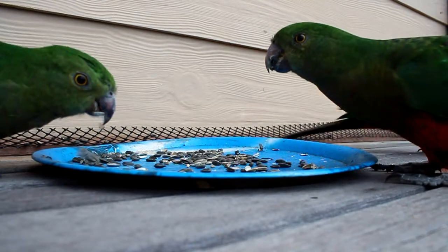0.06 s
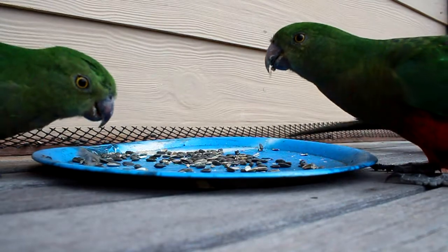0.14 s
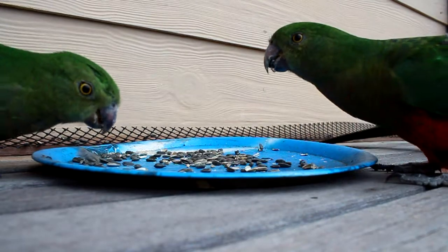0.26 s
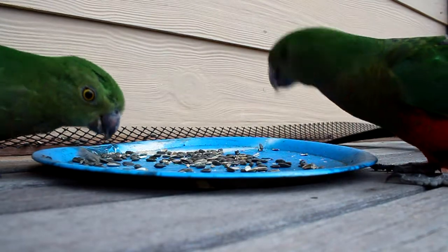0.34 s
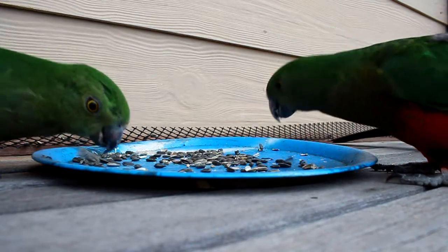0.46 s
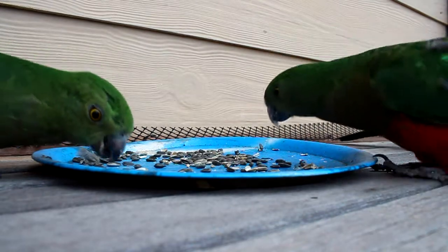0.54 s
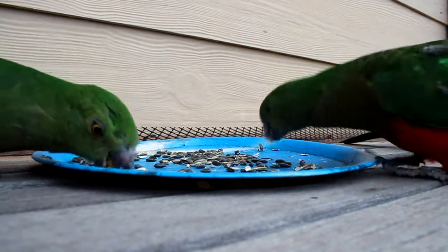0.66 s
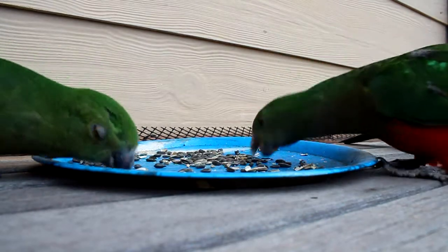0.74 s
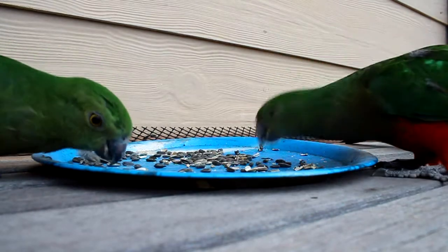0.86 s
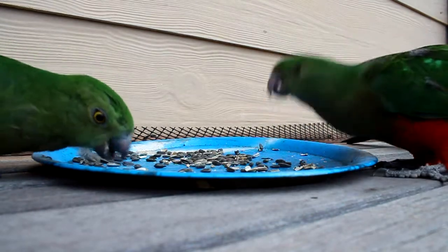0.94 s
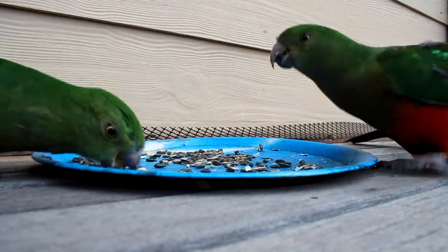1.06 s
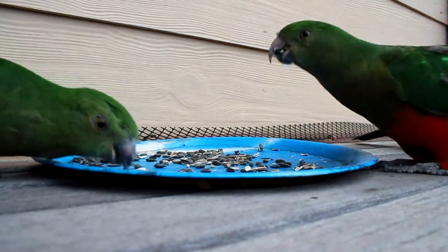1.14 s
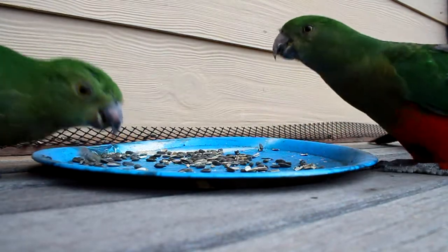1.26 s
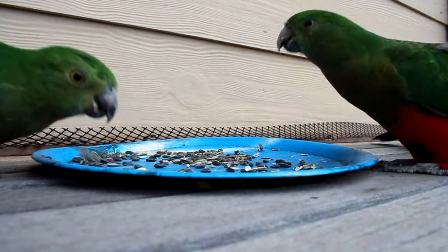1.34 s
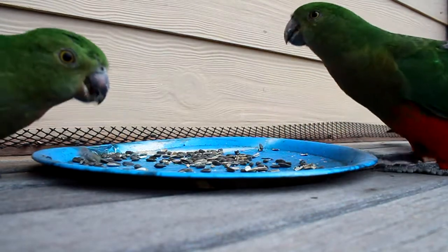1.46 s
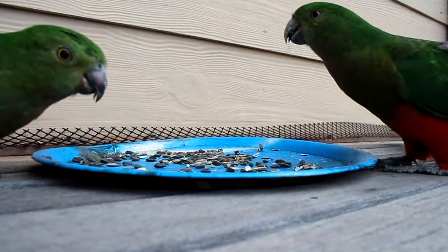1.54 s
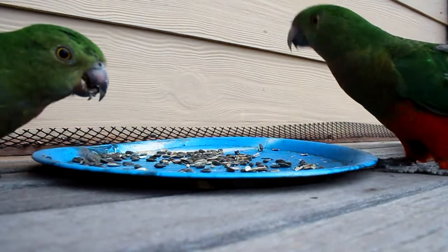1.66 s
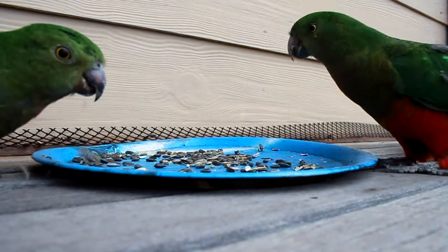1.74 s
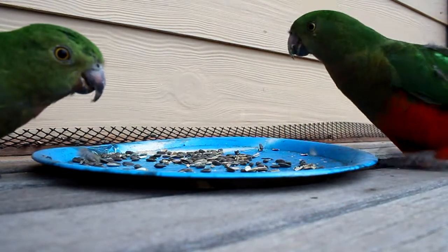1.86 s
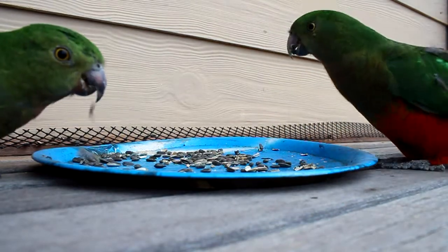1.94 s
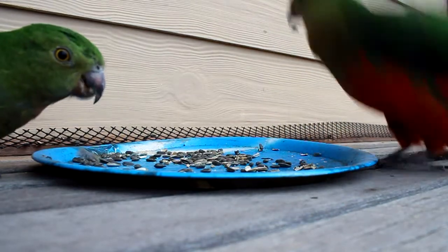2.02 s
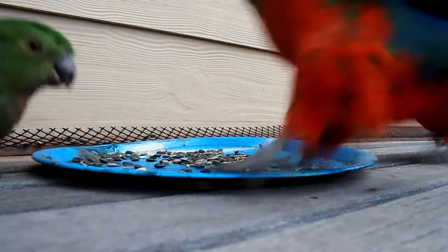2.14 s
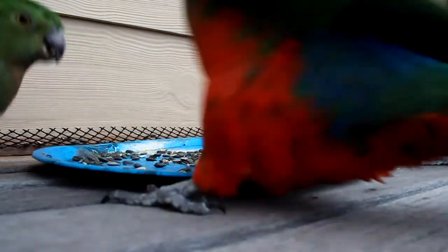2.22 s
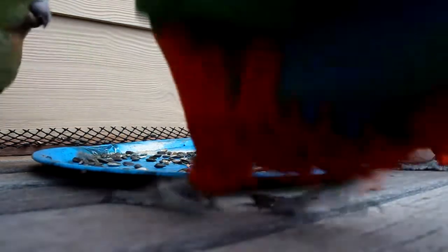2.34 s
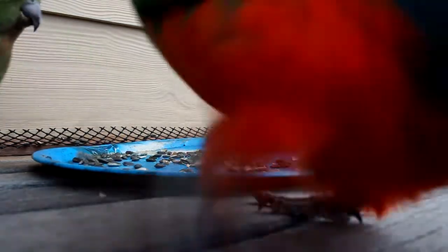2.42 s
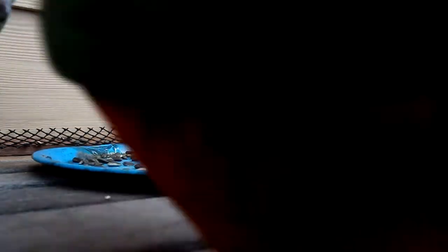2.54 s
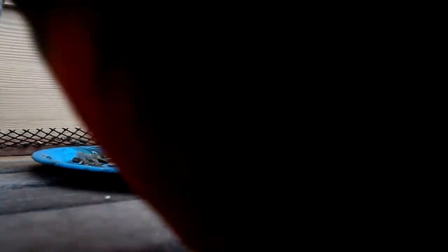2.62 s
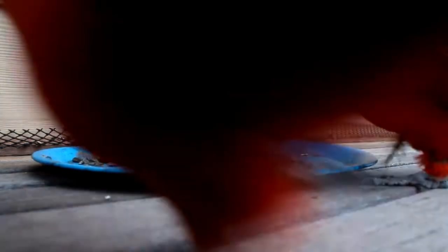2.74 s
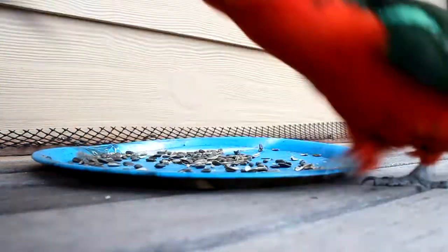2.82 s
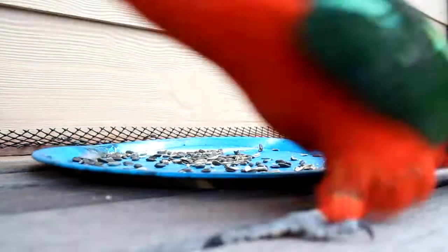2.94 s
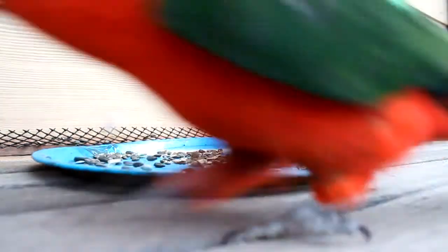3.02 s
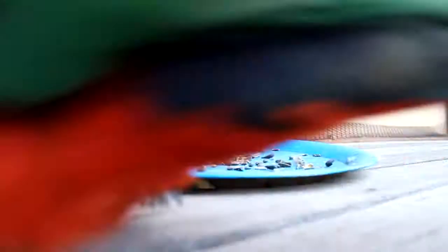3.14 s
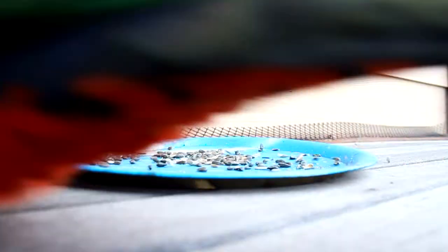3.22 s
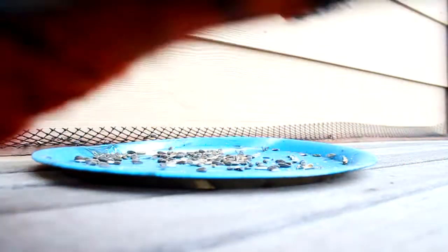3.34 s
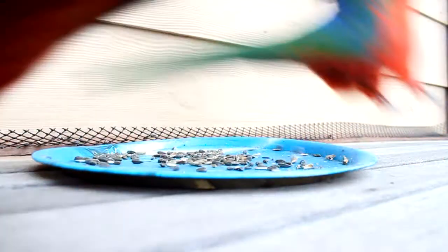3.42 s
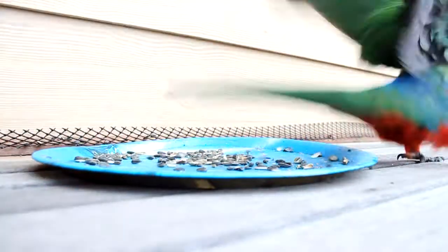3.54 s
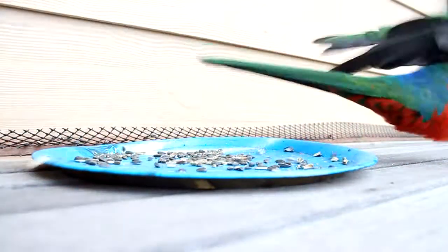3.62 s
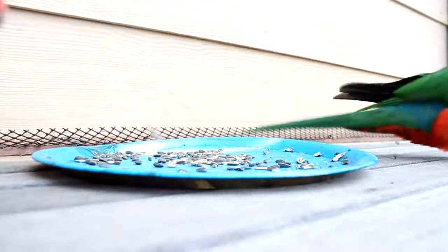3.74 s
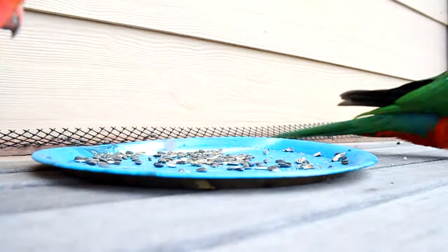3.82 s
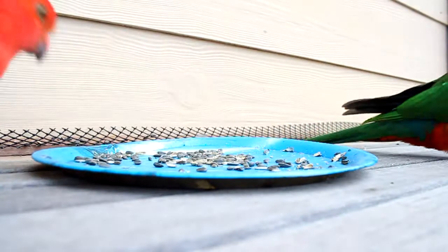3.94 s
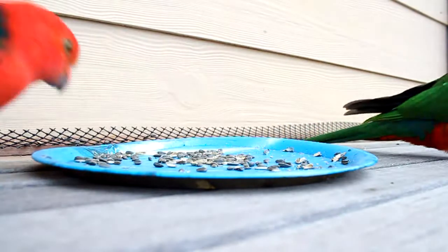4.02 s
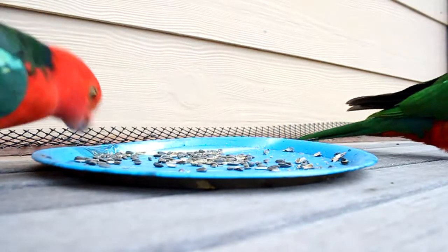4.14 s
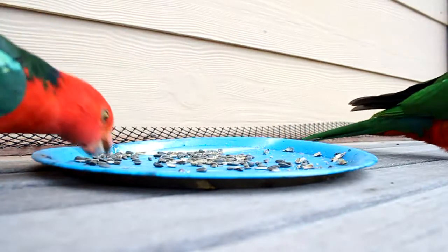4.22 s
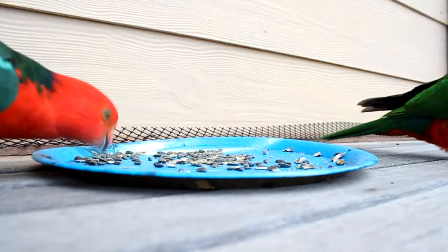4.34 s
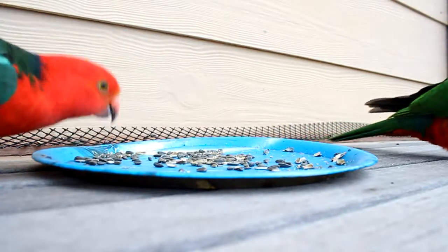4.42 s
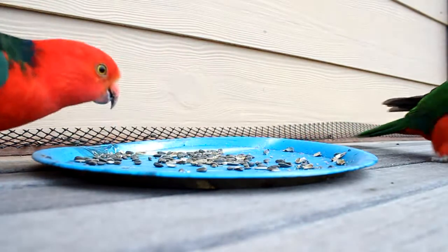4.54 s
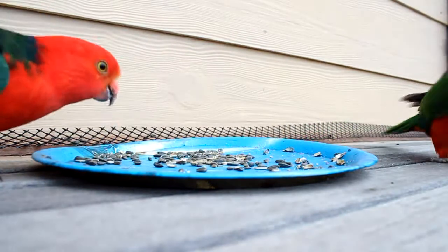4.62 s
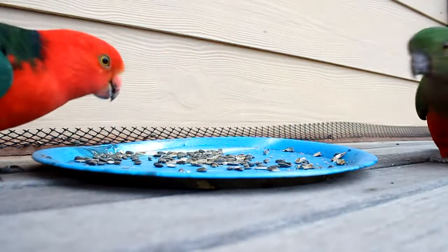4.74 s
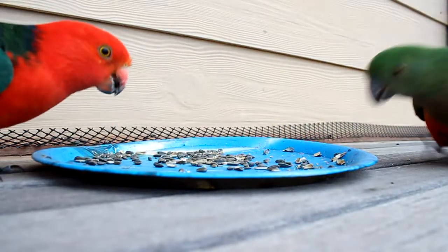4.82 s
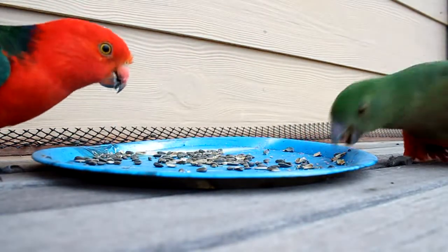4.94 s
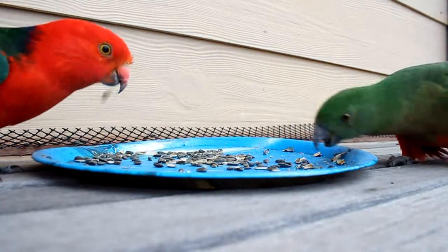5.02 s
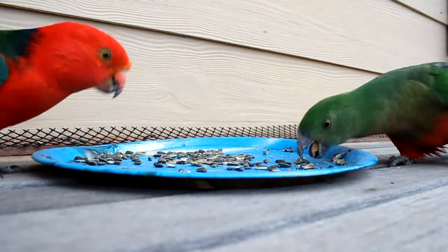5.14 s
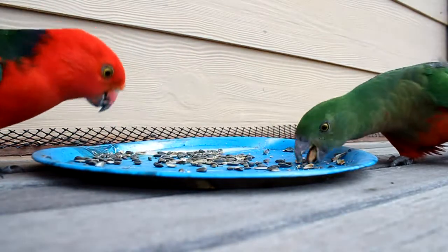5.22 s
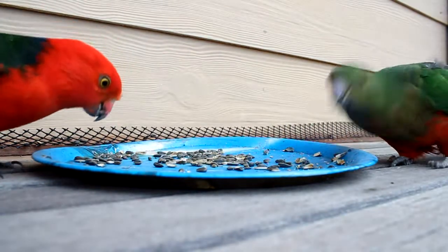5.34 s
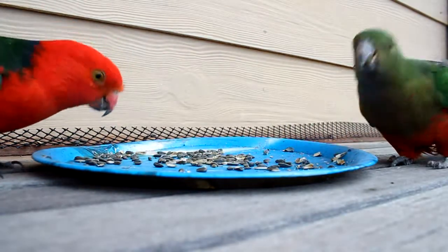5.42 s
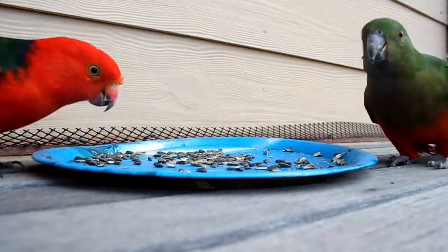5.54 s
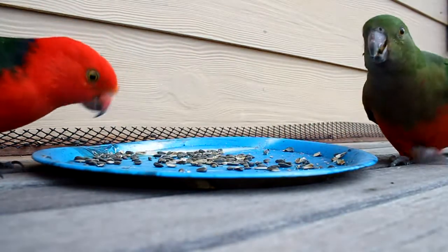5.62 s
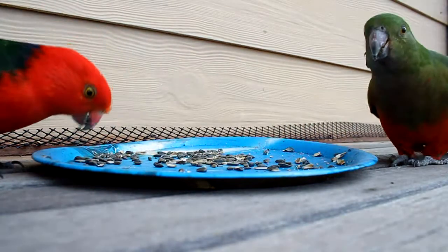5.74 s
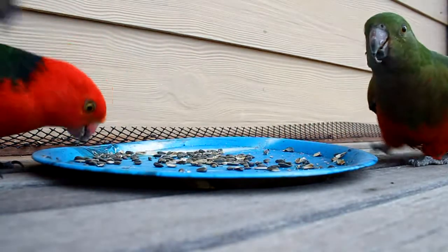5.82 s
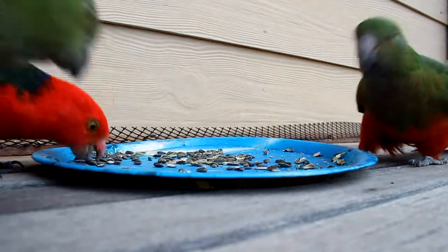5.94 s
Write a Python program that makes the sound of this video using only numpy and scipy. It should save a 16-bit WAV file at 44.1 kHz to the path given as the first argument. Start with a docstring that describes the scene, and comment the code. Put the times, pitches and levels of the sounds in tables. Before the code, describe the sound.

Close, crisp beak clicks and husk crunches, a mid-way burst of scuffing, squeaky chatter and low wing buffets, then sparser seed cracking.

```python
"""Parrots feed from a plastic plate on a wooden deck: beaks crack husks (a snap and clumped clicks through
resonances), knock the plate (rough contact into its modes) and peck the rim (decaying sines over a rattle).
Grains and noise make the rustle, low band noise the treads. A chattering squabble is pulses and breath noise
ringing in a throat; wing beats push short low swings of air at the close, small microphone.
Faint outdoor air and microphone hiss run throughout."""
import sys
import numpy as np
from scipy import signal
from scipy.fft import rfft, irfft
from scipy.io import wavfile
from scipy.ndimage import uniform_filter1d

SR = 44100
rng = np.random.default_rng(int(sys.argv[2]) if len(sys.argv) > 2 else 0)


def gain_from_db(level_db):
    """Convert decibel levels to linear amplitude factors (20 dB per decade)."""
    decades = np.asarray(level_db, float) / 20
    return 10 ** decades


def transcribe(u):
    """Save the signal u as a 16-bit wav file named by the first command-line argument.

    u: samples, shape (n,) or (channels, n), limited to [-1, 1]; the rate is SR.
    q: integer samples, one column per channel.
    """
    v = np.clip(np.atleast_2d(u).T, -1, 1)
    q = np.round(v * 32767).astype(np.int16)
    wavfile.write(sys.argv[1], SR, q)


N = 263277  # length [samples]

# modes of the plate: (frequency [Hz], relative level [dB], t60 [s])
PLATE_MODES = [(512.5, -5, 0.018), (812, -5, 0.085), (940, -3, 0.05), (1232, -9, 0.04), (1450, -7, 0.035),
               (1900, -7, 0.03), (2400, -9, 0.02), (2955, -11, 0.02)]


def rms_one(x):
    """Scale to unit rms."""
    return x / np.sqrt(np.mean(x ** 2) + 1e-20)


def in_time(rows):
    """Columns of a table as curves at every sample."""
    s, *columns = np.transpose(rows)
    return [np.interp(np.arange(N) / SR, s, c) for c in columns]


def cut(x, hz, kind, order=2):
    """Butterworth filter."""
    sos = signal.butter(order, np.clip(hz, 10, .45 * SR), kind, fs=SR, output="sos")
    return signal.sosfilt(sos, x)


def resonance(x, hz, width_hz):
    """Two-pole resonance, gain 1 on top."""
    r = np.exp(-np.pi * width_hz / SR)
    feedback = [1, -2 * r * np.cos(2 * np.pi * hz / SR), r * r]
    return signal.lfilter([(1 - r * r) / 2, 0, (r * r - 1) / 2], feedback, x + 1e-18)


def drift(rate_hz):
    """Slow random wander with unit rms."""
    r = np.exp(-2 * np.pi * rate_hz / SR)
    wander = signal.lfilter([1], [1, -2 * r, r * r], rng.standard_normal(N + SR))
    return rms_one(wander[SR:])  # skip the filter's settling


def grains(per_s, spread_db, size):
    """Random clicks of uneven size and either sign."""
    sizes = gain_from_db(spread_db * np.minimum(rng.exponential(1, size), 4)) * rng.choice([-1, 1], size)
    return sizes * (rng.random(size) < per_s / SR)


def add(out, sound, s, peak_db):
    """Place a sound at time s with the given peak."""
    i = round(s * SR)
    out[i:i + len(sound)] += (gain_from_db(peak_db) * sound / np.abs(sound).max())[:N - i]


def dying(t60, size):
    """Exponential decay, 60 dB down after t60 seconds."""
    return gain_from_db(-60 * np.arange(size) / SR / t60)


def ambience():
    """Steady outdoor air and microphone hiss: noise shaped by a smooth spectrum."""
    # spectrum of the air: (frequency [Hz], relative level per Hz [dB])
    air_spectrum = [(60, -2.5), (860, -3.5), (3000, -19), (16000, -77)]
    level_db = -61.5  # rms
    hz, db = np.transpose(air_spectrum)
    bins_hz = np.fft.rfftfreq(N, 1 / SR) + 1  # off zero for the logarithm
    shape = gain_from_db(np.interp(np.log(bins_hz), np.log(hz), db))
    return gain_from_db(level_db) * rms_one(irfft(rfft(rng.standard_normal(N)) * shape, N))


def rustle():
    """Clumped grains on soft noise; the lower part rings in the plate, the fine ticks in the husks."""
    # birds shuffling: (time [s], level of scuffing on the plate [dB], level of fine ticks and feather hiss [dB])
    shuffling = [(0, -47, -57.5), (.87, -55, -58), (1.5, -55, -58.5), (2.18, -52, -54), (2.24, -35, -65),
                 (2.35, -50, -46), (2.42, -34.5, -53), (2.62, -51.5, -53.5), (2.90, -32, -33),
                 (3.03, -51.5, -52.5), (3.33, -52.5, -57.5), (3.55, -51, -48.5), (4.1, -54, -54.5),
                 (4.84, -54.5, -61.5), (4.93, -48, -65), (5.1, -57.5, -63), (5.48, -53, -53.5),
                 (5.97, -57.5, -53.5)]
    body_db, hiss_db = in_time(shuffling)
    grit = gain_from_db(4 * drift(20)) * (rms_one(grains(500, 3.5, N)) + rng.standard_normal(N))
    ticks = gain_from_db(5 * drift(25)) * (rms_one(grains(500, 3.5, N)) + .8 * rng.standard_normal(N))
    plate = sum(gain_from_db(db) * rms_one(resonance(grit, hz, 91)) for hz, db, _ in PLATE_MODES)
    body = rms_one(cut(grit, [300, 4000], "band")) + 1.45 * rms_one(plate)
    husk = rms_one(cut(ticks, 6600, "high")) + 0.39 * rms_one(resonance(ticks, 7600, 1500))
    return gain_from_db(body_db) * rms_one(body) + gain_from_db(hiss_db) * rms_one(husk)


def treads():
    """Each slide of the feet rubs the boards in a soft low band, over a faint, unevenly wavering rumble."""
    # feet sliding and shifting weight: (time of the height [s], level [dB], spread [s], band centre [Hz])
    slides = [(.39, -50, 0.024, 248), (.5, -49.5, 0.032, 277), (3.034, -33, 0.054, 190),
              (3.19, -40.5, 0.057, 153), (3.561, -41.5, 0.086, 150), (3.78, -41, 0.067, 132),
              (4.903, -47.5, 0.019, 436), (4.98, -52.5, 0.05, 277), (5.479, -47.5, 0.028, 280)]
    rumble_db = -70.5  # rms
    t = np.arange(N) / SR
    noise = rng.standard_normal((2, N)) * gain_from_db(3.5 * drift(26))
    out = gain_from_db(rumble_db) * rms_one(cut(noise[0], [80, 300], "band", order=1))
    for s, db, spread, hz in slides:
        width_hz = hz * np.clip(gain_from_db(db + 40), .5, 1)  # heavy treads are broad, light ones narrower
        rub = rms_one(resonance(resonance(noise[1], hz, width_hz), hz, 2 * hz))
        out += gain_from_db(db) * np.exp(-.5 * ((t - s) / spread) ** 2) * rub
    return out


def cracks():
    """A snap rings husk and beak for a few cycles; finer clicks follow in clumps as the husk crumbles."""
    # husks cracking, and noisy scuffs where the crumble is 0 or more: (time [s], peak level [dB],
    #     brightest frequency [Hz], crumble level against the snap, at most 0 in use [dB])
    husk_cracks = [(0.0419, -4.5, 8300, -11), (0.029, -16, 8140, -28), (0.1422, -22, 7700, -10),
                   (0.2127, -6.5, 7400, -12.5), (0.3425, -14, 6550, -10.5), (0.8258, -28.5, 5840, 0),
                   (0.8685, -27, 12000, -12), (0.198, -23, 8050, -20), (0.150, -18, 7960, -11),
                   (0.9758, -26, 8440, -24), (1.047, -29.5, 8900, -24), (1.277, -23, 6500, -23),
                   (1.331, -25.5, 7300, -11), (1.172, -21, 5750, -13.5), (1.414, -3, 14400, -15.5),
                   (1.4244, -5, 8500, -21), (1.4297, -9.5, 8950, -15), (1.452, -22, 8900, -7.5),
                   (1.752, -27, 14200, -25), (1.554, -11.5, 9200, -14.5), (1.583, -17.5, 7700, -29),
                   (1.642, -19.5, 9700, -9.5), (1.6564, -15, 7900, -13), (1.684, -20.5, 7400, -24),
                   (1.7864, -10, 12500, -41), (1.808, -8, 7500, -13.5), (1.8294, -15, 7010, -31),
                   (1.884, -20.5, 7500, -13), (1.93, -21, 9400, -8), (2.017, -19, 15600, -12),
                   (2.0581, -31, 6300, 7), (2.202, -21, 10900, 0), (2.237, -13, 6200, -13),
                   (2.268, -14.5, 5700, -20), (2.346, -24.5, 8900, 0), (2.499, -24, 9300, -24),
                   (2.512, -20, 9200, -22), (2.6463, -20.5, 5500, 0), (3.002, -1, 7300, -28),
                   (3.4819, -15, 8800, -10.5), (3.798, -22, 8100, -11), (3.896, -19, 5800, -28),
                   (4.651, -21.5, 7360, -11.5), (4.69, -8.5, 7000, -21), (4.8195, -19.5, 14400, -21),
                   (4.9131, -20, 5800, -12.5), (4.9635, -9.5, 16000, -15), (5.011, -21, 7400, -15),
                   (5.0553, -8.5, 12900, -26), (5.4757, -20.5, 6900, -24), (5.538, -6.5, 7460, -40),
                   (5.5685, -12.5, 8000, -13.5), (5.6048, -16, 6060, -29), (5.678, -22.5, 6600, -9),
                   (5.707, -17, 5740, -24), (5.7635, -18.5, 8000, -53), (5.7893, -18.5, 7450, -41)]
    out, size = np.zeros(N), SR // 6
    for s, peak_db, hz, crumble_db in husk_cracks:
        share = np.clip(gain_from_db(crumble_db), 0, 1)
        clumps = gain_from_db(7 * rms_one(cut(rng.standard_normal(size), 120, "low")) - 7)
        crumble = grains(300, 5.5, size) * .6 + .9 * share * clumps * rng.standard_normal(size)
        force = share * crumble * dying(0.043 + 0.12 * share, size)
        force = np.clip(force, -.3 - share, .3 + share)  # hold stray clicks down
        force[0] = 1  # the snap
        bright = resonance(force, hz, 0.18 * hz)
        bright = bright + 0.55 * cut(force, 5700, "high") + .5 * resonance(force, 7200, 610)
        # each husk rings at pitches of its own
        shell = sum(resonance(force, f, f / 12) for f in 1500 * 2 ** rng.uniform(0, 2, 3))
        middle = 0.65 * cut(force, [1000, 3500], "band")
        add(out, bright + middle + 0.35 * (1 - share) * shell, s, peak_db)
    return out


def knocks():
    """A short uneven contact drives the plate modes, most of all those near the knock's strongest frequency."""
    # beaks and claws on plate and deck: (time [s], peak level [dB], strongest frequency [Hz], contact t60 [s])
    contacts = [(0.103, -24, 1840, 0.074), (0.24, -27, 2100, 0.031), (0.298, -36, 1590, 0.053),
                (0.455, -32, 1890, 0.16), (0.553, -34, 845, 0.19), (0.597, -26.5, 1710, 0.046),
                (0.826, -24.5, 811, 0.35), (1.095, -26.5, 818, 0.27), (2.212, -26, 1145, 0.23),
                (2.391, -19.5, 826, 0.24), (2.405, -18.5, 1076, 0.13), (2.5, -22, 1400, 0.059),
                (2.556, -25.5, 980, 0.34), (2.646, -14.5, 883, 0.037), (2.992, -3, 480, 0.085),
                (3.684, -28.5, 1455, 0.15), (3.86, -30, 1383, 0.15), (4.013, -31.5, 2330, 0.11),
                (4.113, -26.5, 1542, 0.11), (4.159, -36.5, 973, 0.21), (4.327, -29, 685, 0.18),
                (4.362, -21.5, 1042, 0.072), (4.402, -27, 1166, 0.06), (4.524, -28.5, 900, 0.052),
                (4.586, -29.5, 1760, 0.14), (4.705, -25.5, 811, 0.072), (5.28, -31, 887, 0.1),
                (5.387, -27.5, 783, 0.12), (5.583, -33, 833, 0.079), (5.707, -33, 903, 0.068),
                (5.818, -29, 830, 0.046)]
    out, size = np.zeros(N), SR // 4
    for s, peak_db, hz, t60 in contacts:
        unevenness = gain_from_db(5 * rms_one(cut(rng.standard_normal(size), 60, "low")))
        scrape = grains(1300, 4.23, size) + 0.6 * rng.standard_normal(size)
        force = scrape * dying(max(t60, .01), size) * unevenness
        force *= 1 - dying(0.0014, size)  # after the tick the contact builds up
        force[0] = 6  # the tick
        # a beak or foot on the plate shifts its modes: the nearest one lands on the strongest frequency
        bend = min((hz / row[0] for row in PLATE_MODES), key=lambda ratio: abs(np.log(ratio)))
        sound = gain_from_db(-43.5) * cut(force, 710, "high")
        for mode_hz, mode_db, mode_t60 in PLATE_MODES:
            near_db = -17 * abs(np.log2(mode_hz * bend / hz)) + rng.normal(0, 2.5)
            width_hz = np.log(1000) / np.pi / mode_t60
            ring = resonance(force, mode_hz * bend, width_hz) / np.sqrt(width_hz)
            sound = sound + gain_from_db(mode_db + near_db) * ring
        add(out, cut(sound, 4270, "low"), s, peak_db)
    return out


def pecks():
    """A hard beak tip sets the rim modes ringing over a burst of rattling seeds."""
    # hard pecks on the plate rim: (time [s], peak level [dB], brightest frequency [Hz])
    rim_pecks = [(0.577, -26, 7800), (0.72, -17.5, 2230), (2.1159, -8.5, 9900), (5.936, -21.5, 5840)]
    # modes of the rim: (frequency [Hz], relative level [dB], t60 [s])
    rim_modes = [(1530, -8, .14), (2250, -10, .07), (3120, -9, .07), (3950, -9, .06), (4550, -9, .05),
                 (5480, -8, .08), (9100, -12, .03), (10500, -6, .04), (11470, -6, .03)]
    out, size = np.zeros(N), SR // 6
    t = np.arange(size) / SR
    for s, peak_db, hz in rim_pecks:
        rings = np.zeros(size)
        for f, db, t60 in rim_modes:
            near_db = -4.8 * abs(np.log2(f / hz))  # modes far from the brightest are weaker
            rings += gain_from_db(db + near_db) * np.sin(2 * np.pi * f * t) * dying(t60, size)
        rattle = rms_one(resonance(rng.standard_normal(size), hz, 1.03 * hz)) * dying(0.094, size)
        add(out, rings / np.abs(rings).max() + 0.5 * rattle, s, peak_db)
    return out


def syrinx(t, length, hz, level_db, tilt_db, rough):
    """Pulses at the pitch, with breath noise gated each cycle, ring in the throat."""
    # throat and open beak: (frequency [Hz], width [Hz], level [dB])
    throat_modes = [(1400, 950, 5.5), (3030, 80, 14.5), (4470, 2000, 0.5)]
    high = np.clip(hz / 1500, .3, 1)  # below 1500 Hz the voice is rougher and its overtones fall less
    wobble = rms_one(cut(rng.standard_normal(len(t)), 540, "low"))
    phase = 2 * np.pi * np.cumsum(hz * (1 + .12 * rough / high * wobble)) / SR
    pulses = np.zeros(len(t))
    for k in range(1, 19):
        overtone = np.cos(k * phase) * (k * hz < 12000)
        pulses += overtone * gain_from_db(-tilt_db * high * np.log2(k))
    breath = cut(rng.standard_normal(len(t)), 9000, "low") * (1 + np.cos(phase))
    source = pulses + 2 * rough / high * breath
    voice = 0.53 * cut(source, 480, "high")
    for k, (f, width_hz, db) in enumerate(throat_modes):
        voice = voice + (-1) ** k * gain_from_db(db) * resonance(source, f, width_hz)  # signs alternate
    voice = cut(voice, 7500, "low")
    voice /= np.sqrt(uniform_filter1d(voice ** 2, size=180) + 1e-9)  # effort alone sets the level
    fade_in = np.clip(t / 0.0052, 0, 1)
    fade_out = gain_from_db(-np.maximum(t - length, 0) * 1200)
    return voice * gain_from_db(level_db) * fade_in * fade_out


def chatter():
    """Held notes slide evenly from first to last pitch; croaks drop fast towards a low floor."""
    # held notes of the squabble: (time [s], longest length [s], first pitch [Hz], last pitch [Hz],
    #     level once swollen [dB], overtone fall at 1500 Hz and above [dB/octave])
    held_notes = [(2.572, 0.026, 2440, 2520, -41, 18), (2.649, 0.01, 2910, 2325, -26.5, 31),
                  (2.763, 0.02, 2400, 2375, -24, 30), (2.783, 0.025, 2800, 2320, -27, 25),
                  (2.855, 0.027, 2470, 2810, -31.5, 17), (2.874, 0.036, 2580, 2396, -25, 5),
                  (2.896, 0.01, 2275, 2243, -14.5, 0), (2.959, 0.057, 1248, 1230, -30, -6.5),
                  (3.057, 0.03, 1180, 1146, -37, 1), (3.09, 0.014, 2315, 2260, -18.5, 1),
                  (3.145, 0.07, 2430, 2320, -44.5, 16), (3.238, 0.026, 1170, 1113, -41, -0.5),
                  (3.266, 0.013, 2285, 2240, -32.5, 1), (3.332, 0.035, 1264, 1510, -42.5, -2),
                  (3.421, 0.021, 670, 720, -35.5, 0), (3.486, 0.013, 1400, 1660, -34, 8)]
    # falling croaks that end the calls: (time [s], length [s], pitch fallen from [Hz], fall time [s],
    #     level, 2 dB under the midway height [dB], overtone fall at 1500 Hz and above [dB/octave])
    falling_croaks = [(2.690, .022, 1200, .014, -36, 3), (2.804, .015, 2380, .0035, -27, 14),
                      (2.905, .019, 2280, .0048, -21, 3), (3.098, .02, 2350, .007, -27, 1),
                      (3.282, .019, 2150, .0052, -32, 2), (3.370, .025, 1500, .012, -34, 5),
                      (3.444, .013, 720, .02, -33, 2), (3.503, .021, 1800, .009, -38, 24),
                      (3.570, .028, 1250, .016, -34, 24)]
    start_db, swell_s = -10.5, 0.015  # a note swells from below its level
    floor_hz, ends_db, croak_breath = 430, -6, .09
    out = np.zeros(N)
    for s, length, first_hz, last_hz, db, tilt_db in held_notes:
        # a note breaks into the croak that follows
        length = min([length] + [croak[0] + .002 - s for croak in falling_croaks if croak[0] > s])
        t = np.arange(0, length + 0.0014, 1 / SR)
        hz = np.interp(t, [0, length], [first_hz, last_hz])
        level_db = db + start_db * np.clip(1 - t / swell_s, 0, 1)
        rough = np.clip(.2 - .012 * (db + 35), .03, 1)  # the weaker, the breathier
        i = round(s * SR)
        out[i:i + len(t)] += syrinx(t, length, hz, level_db, tilt_db, rough)
    for s, length, first_hz, fall, db, tilt_db in falling_croaks:
        t = np.arange(0, length + 0.0017, 1 / SR)
        hz = floor_hz + (first_hz - floor_hz) * np.exp(-(t / fall) ** 1.4)
        level_db = db + 2 + ends_db * (2 * t / length - 1) ** 2  # loudest midway
        i = round(s * SR)
        out[i:i + len(t)] += syrinx(t, length, hz, level_db, tilt_db, croak_breath)
    return out


def wing_air():
    """Each lump of air from a wing beat swells and fades at the microphone in a few low swings."""
    # buffets: (time of the height [s], peak level [dB], swing frequency [Hz], spread [s])
    buffets = [(2.996, -10.5, 420, 0.0017), (3.005, -3, 385, 0.0013), (3.054, -11.5, 285, 0.00031),
               (3.180, -18, 374, 0.0087), (3.200, -22.5, 530, 0.0031), (3.245, -24, 457, 0.0043),
               (3.533, -16, 300, 0.00094), (3.592, -21, 380, 0.0066), (3.757, -23, 187, 0.004),
               (3.782, -22.5, 310, 0.0082)]
    out, size = np.zeros(N), SR // 10
    t = np.arange(size) / SR - .05  # zero at the height
    for s, peak_db, hz, spread in buffets:
        turbulence = rms_one(cut(rng.standard_normal(size), [0.44 * hz, 1.66 * hz], "band"))
        swings = np.cos(2 * np.pi * hz * t) + 1.3 * turbulence
        add(out, swings * np.exp(-.5 * (t / spread) ** 2), s + t[0], peak_db)
    return out


def scene():
    """Pecks, cracks, knocks and voices come with a few close echoes; the other layers stay plain."""
    # reflections from plate, deck and wall: (delay [s], level [dB])
    reflections = [(.0015, -10), (.0037, -19)]
    near = pecks() + cracks() + knocks() + chatter()
    for delay, db in reflections:  # a later echo also repeats the earlier one
        lag = round(delay * SR)
        near[lag:] += gain_from_db(db) * cut(near, 16000, "low", order=1)[:-lag]
    return (near + rustle() + treads() + wing_air() + ambience())[None]


def band_limit(x):
    """A steep low-pass at the top of the band."""
    return signal.sosfilt(signal.butter(12, 17060, fs=SR, output="sos"), x)


def record(dry):
    """Gain control ducks after loud sounds and soon recovers; peaks round off, the top is cut."""
    threshold_db, slope, smoothing_s, release_db_per_s = -14.5, .55, 0.031, 80
    level_db = 20 * np.log10(np.abs(dry[0]) + 1e-6)
    release = release_db_per_s * np.arange(N) / SR
    held_db = np.maximum.accumulate(level_db + release) - release  # instant rise, steady fall
    r = np.exp(-1 / (smoothing_s * SR))
    duck_db = signal.lfilter([1 - r], [1, -r], -slope * np.maximum(held_db - threshold_db, 0))
    rounded = .5 * np.tanh(2 * dry * gain_from_db(duck_db))
    top_cut = signal.cheby2(14, 34, 16250, fs=SR, output="sos")  # 34 dB down from 16250 Hz up
    return band_limit(signal.sosfilt(top_cut, rounded))


dry = scene()
out = record(dry)
transcribe(out)
```